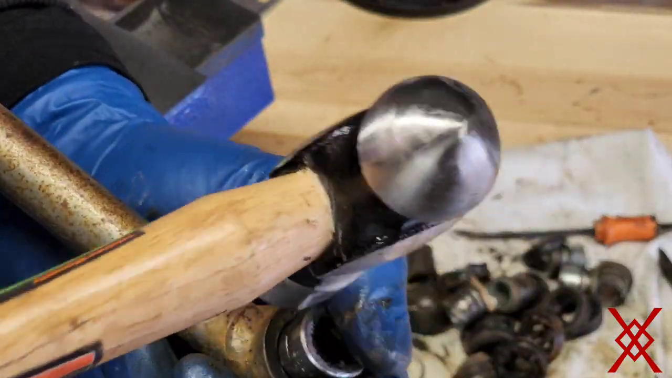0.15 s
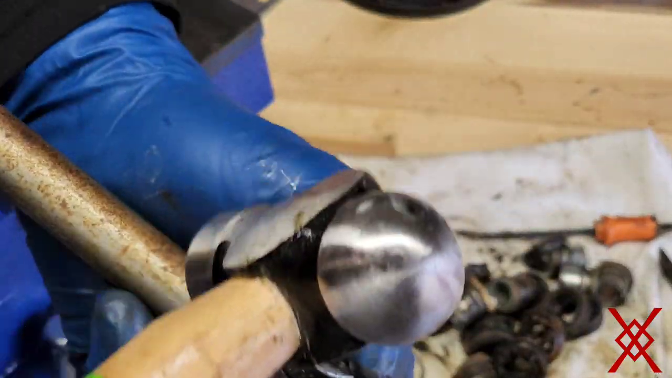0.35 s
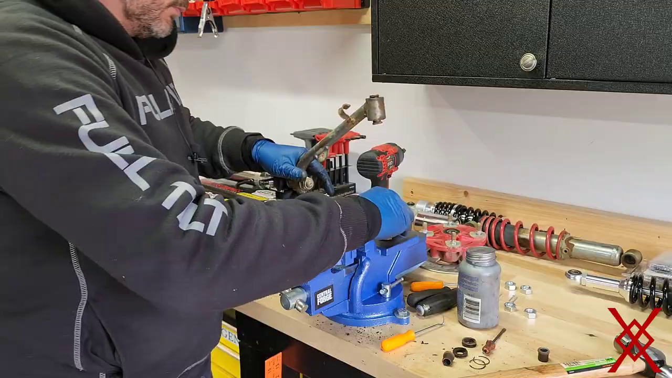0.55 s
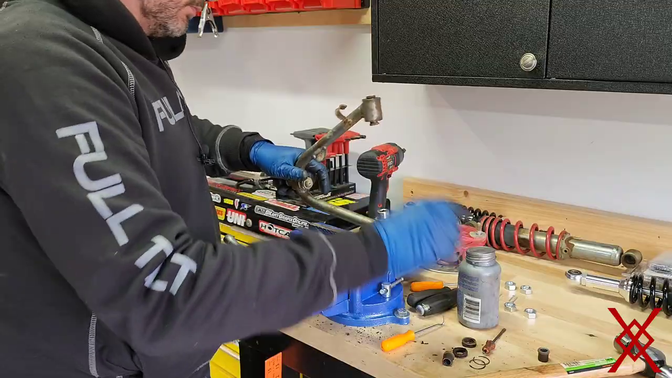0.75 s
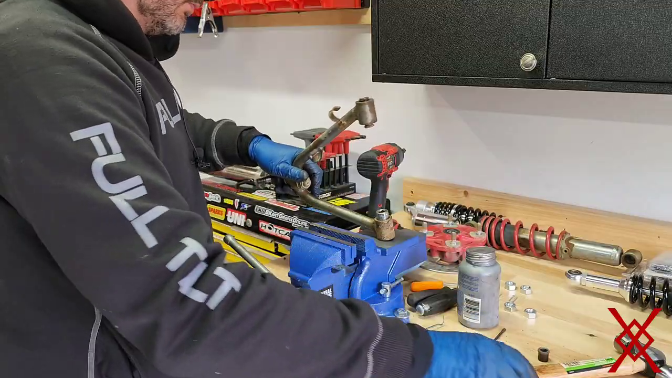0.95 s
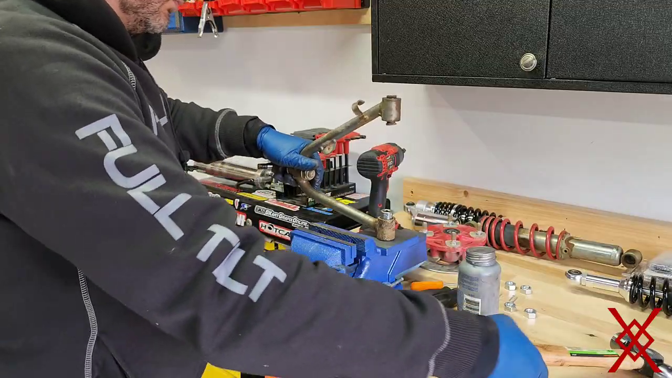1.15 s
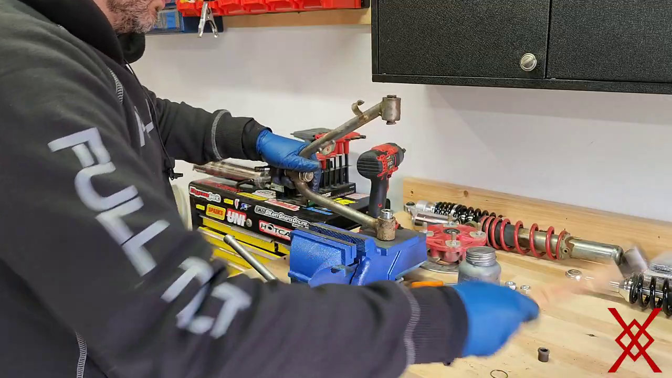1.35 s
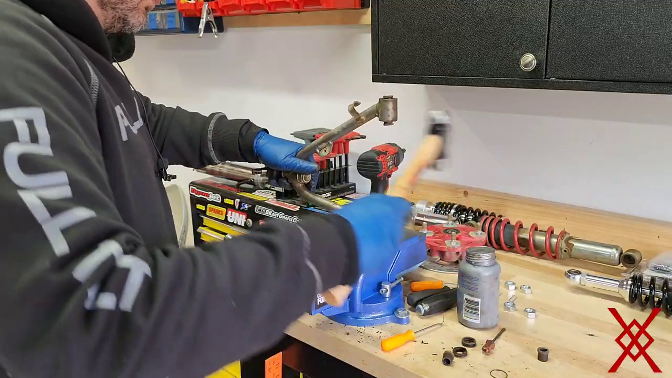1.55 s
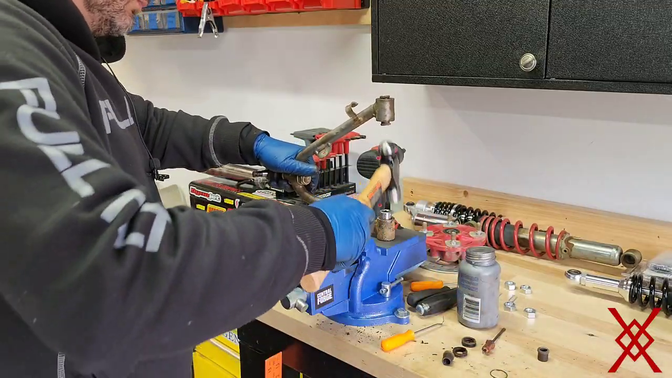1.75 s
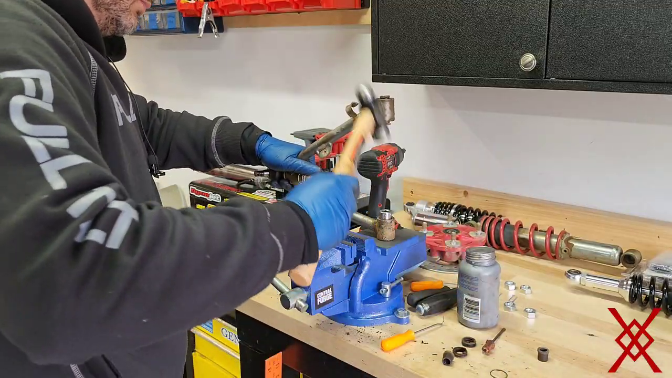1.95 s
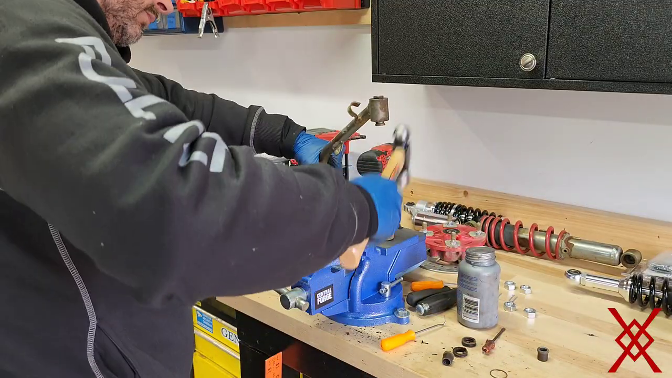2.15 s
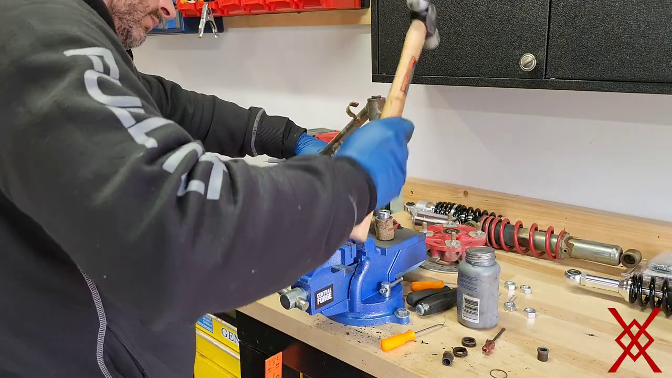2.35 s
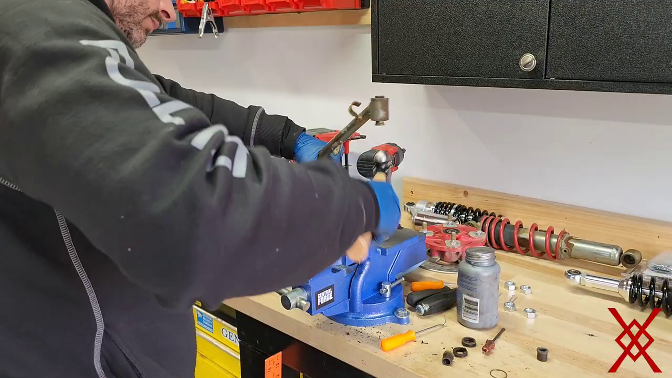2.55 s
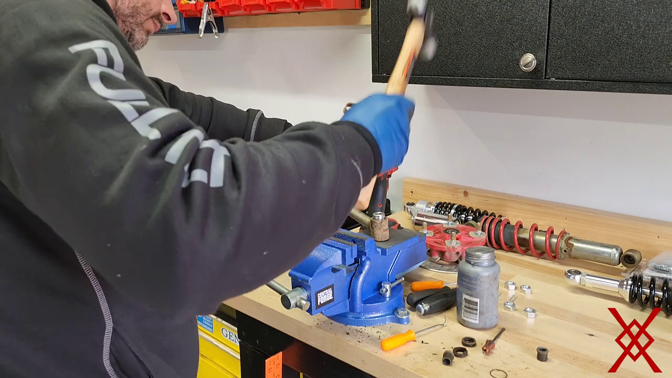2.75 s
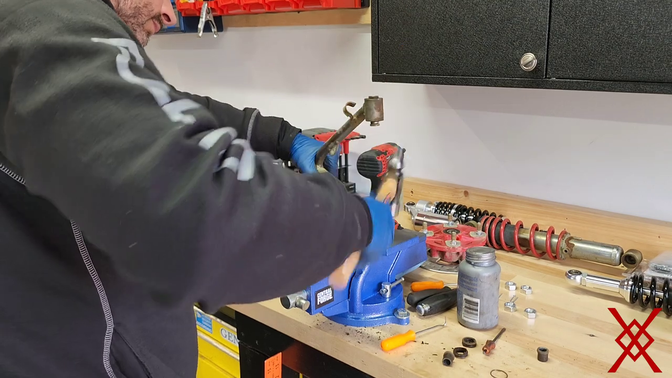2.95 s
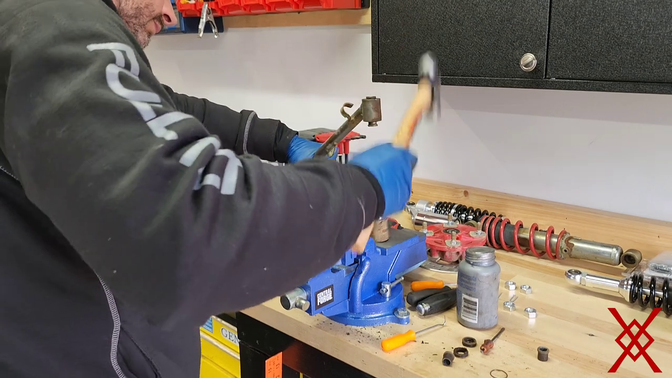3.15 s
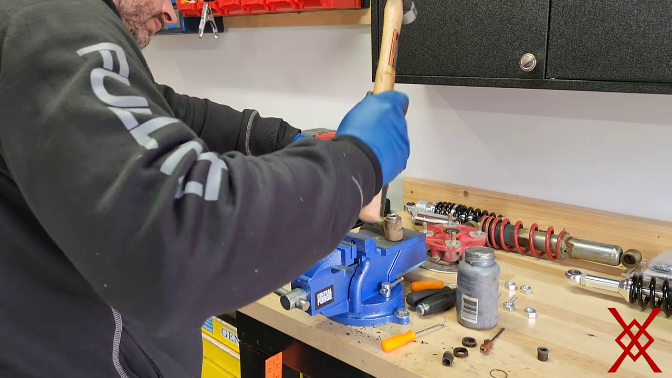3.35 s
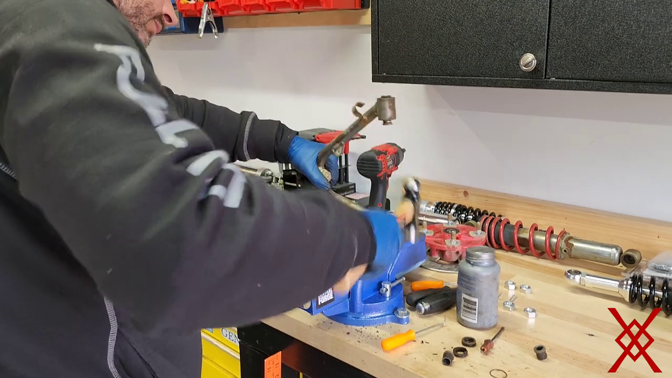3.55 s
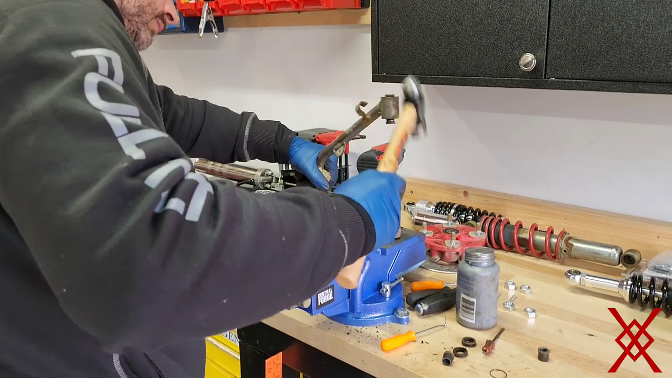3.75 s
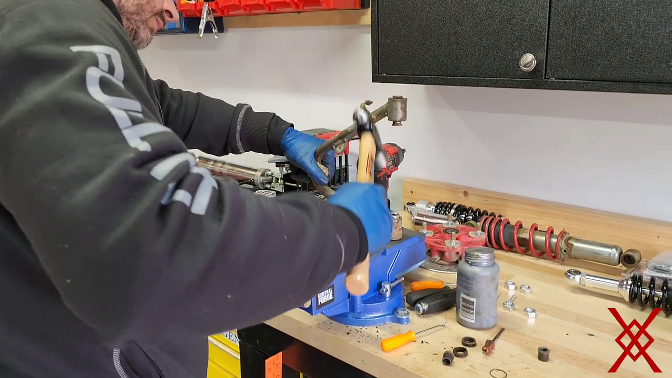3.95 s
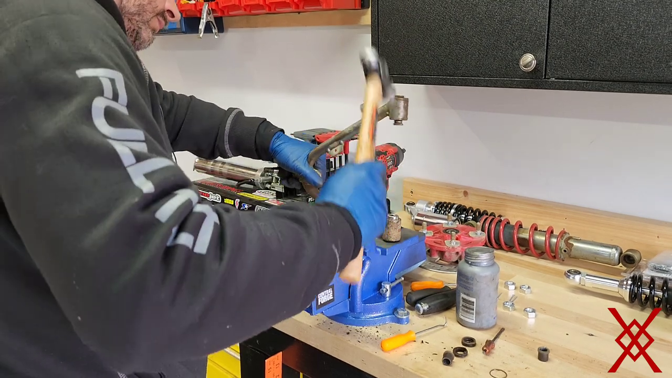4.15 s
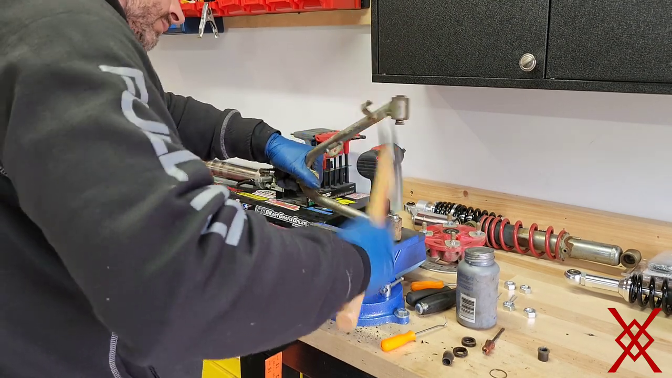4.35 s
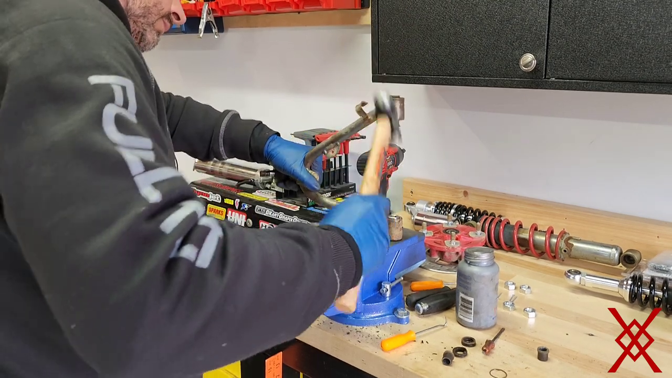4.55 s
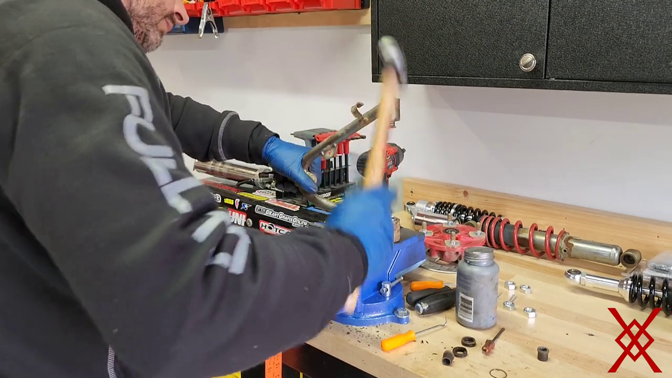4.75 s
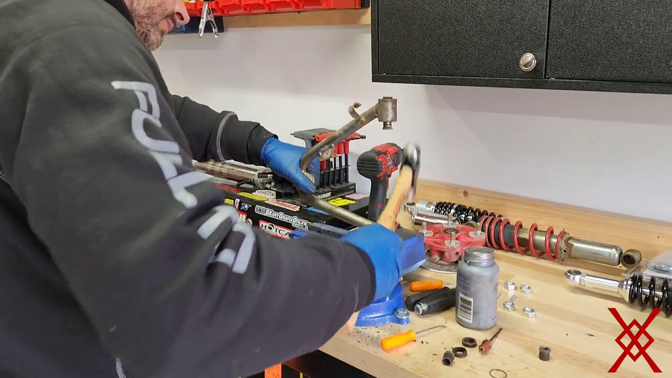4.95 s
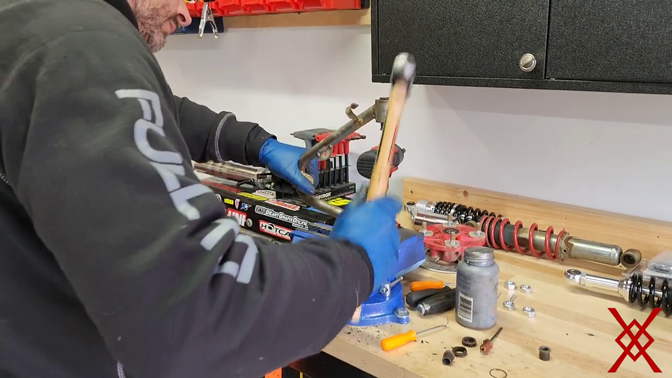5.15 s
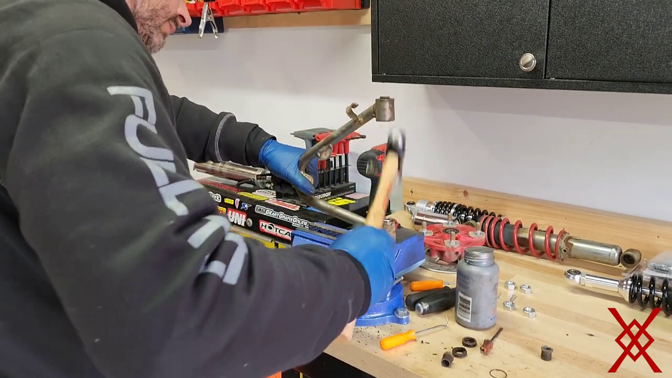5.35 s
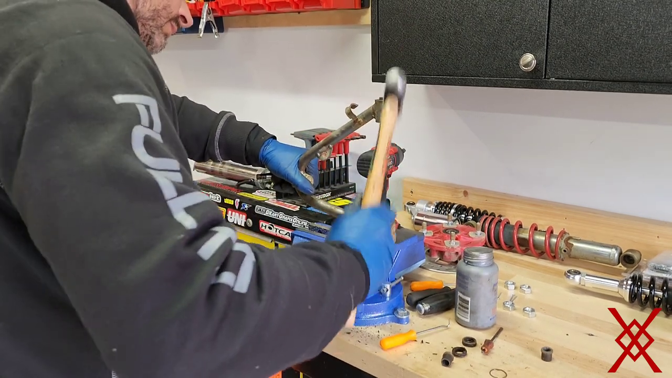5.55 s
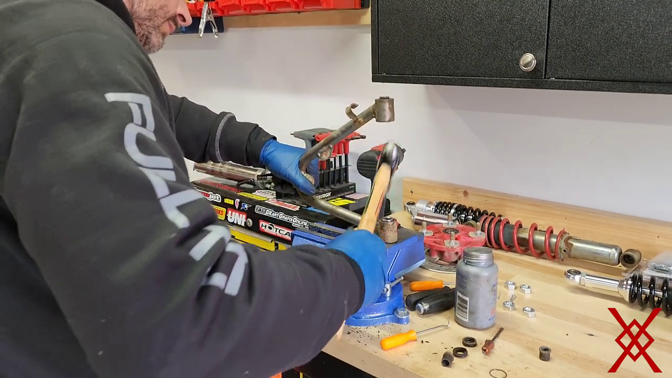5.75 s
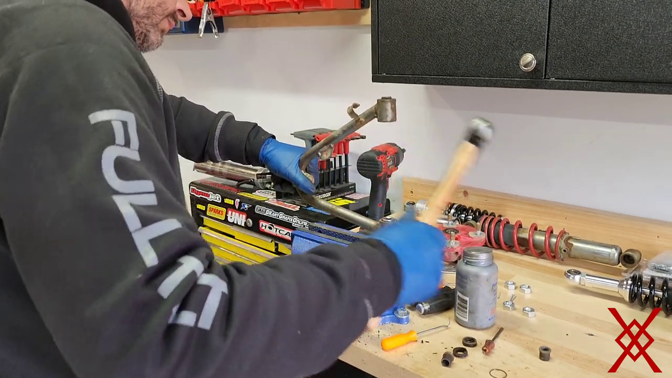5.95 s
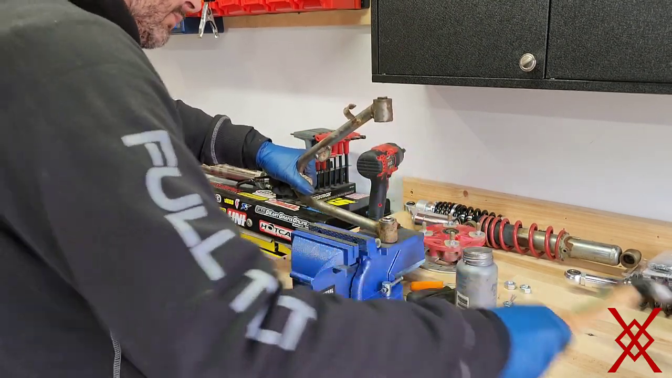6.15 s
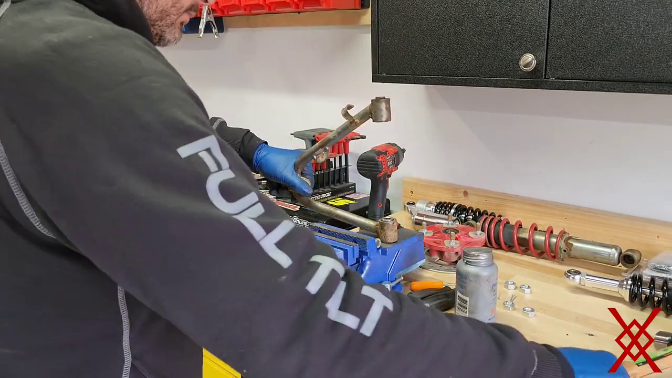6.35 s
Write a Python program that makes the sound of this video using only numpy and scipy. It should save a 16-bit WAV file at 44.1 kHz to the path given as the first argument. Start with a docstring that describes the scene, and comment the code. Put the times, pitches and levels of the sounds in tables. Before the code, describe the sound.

Quiet gripping noise and faint metallic ring open, cut by a brief gap, then a thick double thump on wood, smaller bumps, tiny tinkles and cloth movement. From under three seconds, seven heavy hammer blows strike clamped steel, irregularly spaced, bright and clangy with woody weight. Light steel touches precede some blows; small parts bounce afterward. Close stereo microphones, peaks flattened, modest indoor room.

```python
"""First close broad hiss and a gripping glove over a faint rumble, a short silence, then bumps and sleeve rustle.
Then a hammer drives a steel part in a vise on a wooden bench: seven hard blows and three light touches.
Each blow is a noise crack, ringing steel modes, a bench boom and a room tail; loose parts land after it.
Bumps, bounces and rustle are coloured noise. Two close microphones feed a limiter that flattens the peaks."""
import sys
import numpy as np
from scipy import signal
from scipy.fft import rfft, irfft
from scipy.io import wavfile
from scipy.ndimage import uniform_filter1d, minimum_filter1d

SR = 44100
rng = np.random.default_rng(int(sys.argv[2]) if len(sys.argv) > 2 else 0)


def persist_wave(psi):
    """Save psi, clipped to +-1, as 16-bit WAV."""
    counts = np.round(np.clip(psi, -1, 1) * 32767).astype(np.int16)
    wavfile.write(sys.argv[1], SR, np.atleast_2d(counts).T)


N = 282240
T = np.arange(round(1.5 * SR)) / SR  # time within one struck sound (s)
HZ = np.fft.rfftfreq(len(T), 1 / SR)


def amp(db):
    """Decibels to gain."""
    return 10 ** (np.asarray(db) / 20)


def unit(x):
    """Scales to rms 1."""
    return x / np.sqrt(np.mean(x ** 2) + 1e-20)


def read(points, hz):
    """Reads a table along a log-frequency axis."""
    f, value = np.transpose(points)
    return np.interp(np.log(hz + 1), np.log(f + 1), value)


def add(mix, s, sound):
    """Adds a sound at time s."""
    part = mix[round(s * SR):][:len(sound)]
    part += sound[:len(part)]


def noise(spectrum, size):
    """Noise of rms 1 with the given colour."""
    white = rfft(rng.standard_normal(size))
    colour = amp(read(spectrum, np.fft.rfftfreq(size, 1 / SR)))
    return unit(irfft(white * colour, size))


def fade(t60):
    """Free decay after a hit: 60 dB down after t60 seconds."""
    return np.exp(-np.log(1000) * T / max(t60, 1e-3))


def swell(rise, delay):
    """Onset of a part that the shock takes time to reach; rise and delay in seconds."""
    return 1 - np.exp(-np.maximum(T - delay, 0) / max(rise, 1e-4))


def mode(hz, db, t60):
    """One dying partial."""
    return amp(db) * fade(t60) * np.sin(2 * np.pi * (hz * T + rng.random()))


def ring(modes, t60, spread_db):
    """Each strike excites the modes a little differently; higher modes die a little sooner."""
    total = 0
    for hz, db in modes:
        strike_db = spread_db * (2 * rng.random() - 1)
        total = total + mode(hz, db + strike_db, t60 / (1 + hz / 40000))
    return total


def dense_ring(spectrum, decays, peaky_db):
    """Countless overlapping modes, some standing out, whose bands die at their own speeds."""
    smooth = uniform_filter1d(uniform_filter1d(rng.standard_normal(len(HZ)), size=50), size=50)
    peaks = np.clip(unit(smooth), -2.5, 2.5)
    peaky = irfft(rfft(noise(spectrum, len(T))) * amp(peaky_db * peaks), len(T))
    partials = rfft(unit(peaky))
    centres, t60s = np.transpose(decays)
    total = 0
    for one, t60 in zip(np.eye(len(centres)), t60s):
        band = read(np.c_[centres, one], HZ)  # neighbouring bands crossfade
        total = total + irfft(partials * band, len(T)) * fade(t60)
    return total


def level(s, db):
    """Gain that follows a level curve and is silent outside it."""
    return uniform_filter1d(np.interp(np.arange(N) / SR, s, amp(db), left=0, right=0), size=200)


# The quiet bed under the whole scene. Each row: frequency in Hz, relative density in dB per Hz.
FLOOR_SPECTRUM = [(15, -29.5), (25, -17.5), (53, 8), (97, -7), (195, -28.5), (911, -23.5), (2410, -46),
                  (4370, -33), (16000, -43)]


def floor():
    """Steady room rumble, as low-heavy noise."""
    return amp(-60) * noise(FLOOR_SPECTRUM, N)


# Level curves of the opening. Each row: time in seconds, relative level of the close hiss in dB,
# relative level of the glove's grip in dB.
HISS_AND_GRIP = [(0.0, -52, -36.5), (0.07, -58, -40.5), (0.374, -55.5, -48.5), (0.624, -53.5, -51),
                 (0.67, -54, -60)]
# Colour of the close hiss. Each row: frequency in Hz, relative density in dB per Hz.
HISS_SPECTRUM = [(18, -65), (30, -34), (77, -17), (303, -6), (937, -14), (1350, -14.5), (2060, -18.5),
                 (9710, -24), (16000, -42)]


def hiss():
    """Broad close hiss that follows its own level curve."""
    s, hiss_db, _ = np.transpose(HISS_AND_GRIP)
    return amp(6) * level(s, hiss_db) * noise(HISS_SPECTRUM, N)


def grip():
    """The glove gripping the tools: dull noise that follows its own level curve."""
    s, _, grip_db = np.transpose(HISS_AND_GRIP)
    glove = [(25, -34), (80, 7), (240, 3.5), (500, -12.5), (1500, -18.0), (4000, -75)]  # (Hz, dB per Hz)
    return amp(-2.5) * level(s, grip_db) * noise(glove, N)


def handled_tool():
    """A handled tool still rings at the start, as one dying partial."""
    out = np.zeros(N)
    add(out, 0, mode(1735, -47.0, 0.77))
    return out


# Dull bumps of hand and tools on the bench top. Each row: start in seconds, level in dB,
# treble corner in Hz, t60 of the main decay in seconds.
BUMPS = [(.18, -37.5, 1400, 0.31), (.694, -20.5, 385, 0.28), (0.709, -14, 1050, 0.08),
         (1.112, -24.5, 660, 0.096), (1.298, -33.5, 720, 0.26), (1.36, -33, 1040, 0.086),
         (1.475, -41.5, 487, .085), (1.874, -31, 247, 0.42)]


def bumps():
    """Soft contact with wood: low noise with a gentle onset and a faint longer tail."""
    out = np.zeros(N)
    soft = swell(.001, 0) ** 2
    for s, db, hz, t60 in BUMPS:
        wood = [(25, -22), (55, -3), (130, 2), (hz, -6), (2.22 * hz, -27), (16000, -58)]  # (Hz, dB per Hz)
        decay = fade(t60) + 0.042 * fade(0.59)
        add(out, s, amp(db) * noise(wood, len(T)) * decay * soft)
    return out


# How the bench and the metal on it die away. Each row: frequency in Hz, t60 in seconds.
BENCH_T60 = [(60, .4), (200, .25), (3000, .25), (8000, .23), (15000, .175)]


def tick(db, t60):
    """A tiny piece of metal tinkles: dense high modes, shortened by a further decay of t60 seconds."""
    spectrum = [(500, -20), (3000, -7), (5500, 0), (9500, -3), (16000, -26)]  # (Hz, dB per Hz)
    tinkle = dense_ring(spectrum, BENCH_T60, peaky_db=5)
    return amp(db) * tinkle * fade(t60)


# Handled metal at the bench. Each row: start in seconds, level in dB, t60 of the added decay in seconds.
TICKS = [(.613, -45, .24), (.711, -43.5, 0.03), (.884, -43, 0.012), (1.35, -44.5, 0.25)]


def ticks():
    """Small metal tinkles as the tools are handled."""
    out = np.zeros(N)
    for s, db, t60 in TICKS:
        add(out, s, tick(db, t60))
    return out


# Movement of the arm. Each row: time in seconds, relative level of the rustle in dB.
SLEEVE_LEVEL = [(0.74, -70), (0.852, -76), (1.082, -64.5), (1.278, -61.5), (1.952, -89), (2.094, -74),
                (2.22, -70.5), (2.3, -93)]
# Colour of the cloth. Each row: frequency in Hz, relative density in dB per Hz.
SLEEVE_SPECTRUM = [(100, 12), (1400, 0.5), (2600, -10.5), (4500, -4.5), (7000, -5), (10500, -15),
                   (16000, -34)]


def sleeve():
    """Rustling cloth: noise whose level follows the arm and flickers with a random grain."""
    grain = unit(uniform_filter1d(rng.standard_normal(N), size=300))
    movement = level(*np.transpose(SLEEVE_LEVEL))
    return amp(9) * movement * noise(SLEEVE_SPECTRUM, N) * amp(1.9 * grain)


# The hammer's first contact. Each row: frequency in Hz, relative density in dB per Hz.
CRACK_SPECTRUM = [(300, -13.5), (1500, -12.5), (3500, 5), (9500, 2), (12000, -9.5), (16000, -15.5)]


def crack():
    """The sharp contact of hammer and steel: a short bright burst of noise."""
    return amp(-0.5) * noise(CRACK_SPECTRUM, len(T)) * fade(0.083)


def favour(hz, centre_hz, slope_db):
    """The point of impact favours the upper modes near one pitch (dB, sloping per octave up to 0.8 octave)."""
    return -slope_db * (hz > 1200) * min(abs(np.log2(hz / centre_hz)), .8)


# Clear modes of the struck part in the vise. Each row: frequency in Hz, relative level in dB.
STEEL_MODES = [(1290, 5), (1693, -5), (2511, -6), (2597, -7), (3160, 0), (3305, -3), (3771, -7), (4266, 1),
               (4495, -9), (5388, -8), (5572, -9), (7157, -9), (7593, -11), (8018, -13), (8700, -11),
               (9062, -13), (9692, -14), (10405, -16), (10583, -12), (11304, -20), (12440, -18)]
# Dense clatter of the vise. Each row: frequency in Hz, relative density in dB per Hz.
CLATTER_SPECTRUM = [(300, -23.5), (1200, -10), (2000, 5.5), (2850, -31.5), (3400, 3), (4500, 5.5),
                    (5050, 4.5), (5600, 6.5), (6700, -0.5), (9000, 0), (12000, -3.5), (16000, -25)]


def steel_part(centre_hz):
    """A few clear modes of the struck part over the dense clatter of the vise."""
    modes = [(hz, db + favour(hz, centre_hz, 8)) for hz, db in STEEL_MODES]
    clear = amp(-6.5) * ring(modes, t60=.27, spread_db=4)
    clatter = amp(-2) * dense_ring(CLATTER_SPECTRUM, BENCH_T60, peaky_db=5.5)
    return clear + clatter


# High modes of the small steel insert. Each row: frequency in Hz, relative level in dB.
PING_MODES = [(10583, -11), (11740, 0), (12680, 0), (13315, -9)]


def insert_ping():
    """The small steel insert pings in a few high modes."""
    return ring(PING_MODES, t60=0.28, spread_db=1.0)


# Dense body of the wooden bench. Each row: frequency in Hz, relative density in dB per Hz.
BOOM_SPECTRUM = [(25, -22.5), (58, -9.5), (85, -16), (145, -0.5), (300, -1), (500, 0.5), (700, -3.5),
                 (1250, -4.5), (1700, -13), (2800, -17.5), (8000, -47)]
# Clear modes of the bench. Each row: frequency in Hz, relative level in dB.
BENCH_MODES = [(145, -1), (225, -1), (307, 0), (360, -2), (480, 0), (510, -1), (742, -5), (1051, -6),
               (1153, -6)]


def bench_boom():
    """The heavy bench booms a moment after the crack: dense modes with a few clear ones."""
    dense = amp(8.0) * dense_ring(BOOM_SPECTRUM, BENCH_T60, peaky_db=2.0)
    clear = amp(-3.0) * ring(BENCH_MODES, t60=0.24, spread_db=1.5)
    return (dense + clear) * swell(0.0043, 0.0012)


# Colour of the room around the bench. Each row: frequency in Hz, relative density in dB per Hz.
ROOM_SPECTRUM = [(25, -33.5), (58, -8.5), (85, 4.5), (150, 4), (300, -2.5), (600, -7.5), (1200, -12.5),
                 (2200, -23), (5000, -23), (10000, -38.5), (16000, -52)]
# How the room dies away. Each row: frequency in Hz, t60 in seconds.
ROOM_T60 = [(60, 1.3), (200, 1.05), (1000, .95), (3000, .7), (7000, .55), (15000, .25)]


def room_tail():
    """The room answers slightly late and dies slowest in the bass."""
    return amp(-18.5) * dense_ring(ROOM_SPECTRUM, ROOM_T60, peaky_db=2.5) * swell(.02, .004)


# Lightly damped metal around the vise. Each row: frequency in Hz, level in dB before the impact
# favours some modes, t60 in seconds.
LINGER_MODES = [(495, -36, 1.4), (799, -47, 1.1), (882, -47, 1.2), (1190, -37, .9), (1290, -14, .4),
                (1445, -45, 1.5), (2372, -52, 1.1), (3057, -58, 1.3), (3795, -47, 1.2), (4979, -57, 1.1),
                (5574, -28, .48), (7162, -35, .5)]


def lingering(centre_hz):
    """Faint tones that sing on between the blows."""
    return sum(mode(hz, db + favour(hz, centre_hz, 21), t60) for hz, db, t60 in LINGER_MODES)


# Hard blows on the part. Each row: start in seconds, level in dB, firmness of the contact in dB,
# level of the high ping in dB relative to the blow, Hz where the steel rings loudest, Hz where it lingers.
BLOWS = [(2.703, -11, 0, -9.5, 8100, 3340), (3.170, -8, 1, -16, 4130, 1290),
         (3.719, -3.5, -1, -14.5, 2620, 7790), (4.586, -5, 0, -17.5, 3960, 3800),
         (5.029, -7.5, 6, -24, 6350, 5800), (5.44, -11, 5, -13.5, 2870, 2600),
         (5.832, -9.5, 4.5, -28.5, 3880, 5340)]
STEEL_DB = -3  # the steel's drive; firmness raises bench and steel alike


def blows(rebound_s=0.06):
    """Crack and steel together, then the heavy bench and the room; the part jumps and seats itself again."""
    out = np.zeros(N)
    contact = swell(.0008, 0)
    for s, db, firm_db, ping_db, steel_hz, linger_hz in BLOWS:
        boom = amp(firm_db) * bench_boom()
        steel = amp(firm_db + STEEL_DB) * steel_part(steel_hz) * contact
        ping = amp(ping_db) * insert_ping()
        blow = crack() * contact + boom + steel + ping + room_tail()
        # the lingering tones do not follow the level of the blow
        add(out, s, amp(db) * blow + lingering(linger_hz))
        seating_s = s + rebound_s * (1.0 + 0.24 * rng.random())
        add(out, seating_s, amp(db + firm_db + STEEL_DB - 14.5) * steel_part(steel_hz))
    return out


# Time in the air of the parts thrown off the bench. Each entry, one per blow: first flight in seconds.
FLIGHTS_S = [.218, .205, .197, .269, .258, .297, .285]
# Dull rattle on the bench. Each row: frequency in Hz, relative density in dB per Hz.
RATTLE_SPECTRUM = [(80, -17.5), (400, 6.5), (950, 8.5), (1500, 3.5), (2800, -18.5), (6000, -26),
                   (14000, -50.5)]
FLIGHT_KEEP = .6  # share of the flight time kept at each bounce
LANDING_DB, BOUNCE_LOSS_DB = -24.5, 14  # first landing relative to the blow, loss at each bounce
BIT_LAG_S, BIT_DB, BIT_T60 = .031, -48.5, 0.075  # small bit: lag, level relative to the blow, added decay (s)


def loose_parts(count=2):
    """Each blow throws loose parts off the bench; they land and bounce, and a bit of metal falls just behind."""
    out = np.zeros(N)
    soft = swell(.001, 0)
    for (s, db, *_), flight_s in zip(BLOWS, FLIGHTS_S):
        landings = s + np.cumsum(flight_s * FLIGHT_KEEP ** np.arange(count))
        for hop, landing_s in enumerate(landings):
            hop_db = db + LANDING_DB - hop * BOUNCE_LOSS_DB
            add(out, landing_s, amp(hop_db) * noise(RATTLE_SPECTRUM, len(T)) * fade(.13) * soft)
        add(out, landings[0] + BIT_LAG_S, tick(db + BIT_DB, BIT_T60))
    return out


# Light steel-on-steel touches. Each row: start in seconds, level in dB, centre in Hz,
# t60 in seconds (the ring shortens it toward the treble, the contact noise halves it).
CLINKS = [(3.676, -5.5, 3500, 0.017), (4.548, -5, 6030, 0.085), (5.654, -12.5, 7020, 0.039)]
# Modes of the hammer head. Each row: frequency in Hz, relative level in dB.
HEAD_MODES = [(866, -1), (1399, -3), (2034, -6), (3560, -4), (3800, -4), (4005, 0), (4230, -4), (4710, -7),
              (5383, 0), (5878, -7), (8403, -4), (9372, -11), (12150, -9)]
CLINK_WASH, CLINK_WASH_T60 = .022, .3  # faint wash after a touch: gain, t60 (s)


def clinks():
    """The hammer face stays on the part and damps it quickly; the bench hardly moves."""
    out = np.zeros(N)
    for s, db, hz, t60 in CLINKS:
        # modes weaken by 5 dB per octave away from the centre
        modes = [(f, mode_db - 5 * abs(np.log2(f / hz))) for f, mode_db in HEAD_MODES]
        head = 0.48 * ring(modes, t60, spread_db=4.5)
        decay = 0.29 * fade(t60 / 2) + CLINK_WASH * fade(CLINK_WASH_T60)
        contact = noise(CRACK_SPECTRUM, len(T)) * decay
        body = amp(-14.5) * noise(RATTLE_SPECTRUM, len(T)) * fade(0.14) * swell(0.006, 0)
        add(out, s, amp(db) * (head + contact + body))
    return out


def scene():
    """All sources reach two close microphones, which differ only in phase, mostly in the treble."""
    quiet_sounds = floor() + hiss() + grip() + handled_tool() + bumps() + ticks() + sleeve()
    mid = quiet_sounds + blows() + loose_parts() + clinks()
    width = [(2500, -70), (4000, -21), (8000, -17), (13000, -12)]  # (Hz, dB)
    hz = np.fft.rfftfreq(N, 1 / SR)
    ripple = np.sqrt(2) * np.sin(2 * np.pi * (hz / 1300 + rng.random()))
    # a quarter-turn of phase leaves both microphones equally loud
    side = irfft(1j * rfft(mid) * amp(read(width, hz)) * ripple, N)
    return np.array([mid + side, mid - side])


# The short silence after the opening hiss and grip. Its two entries: start and end in seconds.
SILENCE = (.669, .694)
EDGE_HZ = 16000  # upper band limit


def record(dry, recovery_db_per_s=411.5, size=90):
    """A fast limiter shared by both microphones recovers at a steady rate; a brief mute; the band limit."""
    ceiling_db = -.7
    over_db = np.maximum(20 * np.log10(abs(dry).max(0) + 1e-9) - ceiling_db, 0)
    fall = np.arange(N) * recovery_db_per_s / SR
    held_db = np.maximum.accumulate(over_db + fall) - fall
    # the centred windows (in samples) let the gain drop just before each peak
    gain_db = uniform_filter1d(minimum_filter1d(-held_db, size), size)
    limited = dry * amp(gain_db)
    t = np.arange(N) / SR
    is_open = (t < SILENCE[0]) | (t > SILENCE[1])
    muted = limited * uniform_filter1d(1. * is_open, size)
    low_pass = signal.firwin(401, EDGE_HZ, window=("kaiser", 9), fs=SR)
    return signal.oaconvolve(muted, low_pass[None], "same")


dry = scene()
out = record(dry)
persist_wave(out)
```